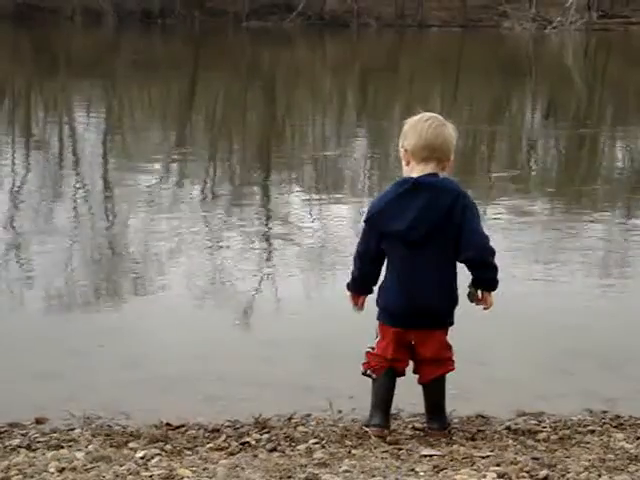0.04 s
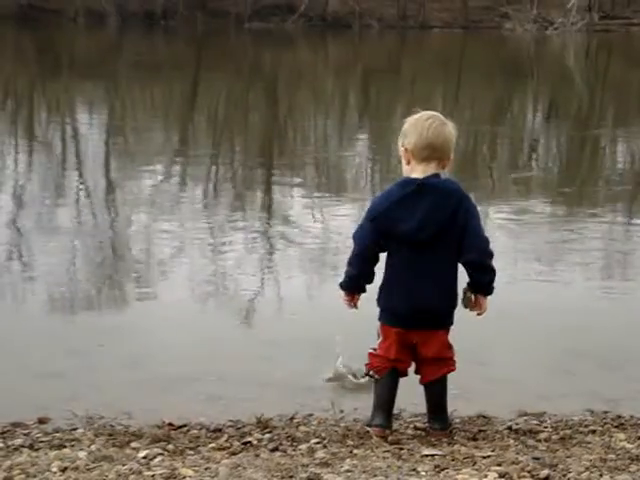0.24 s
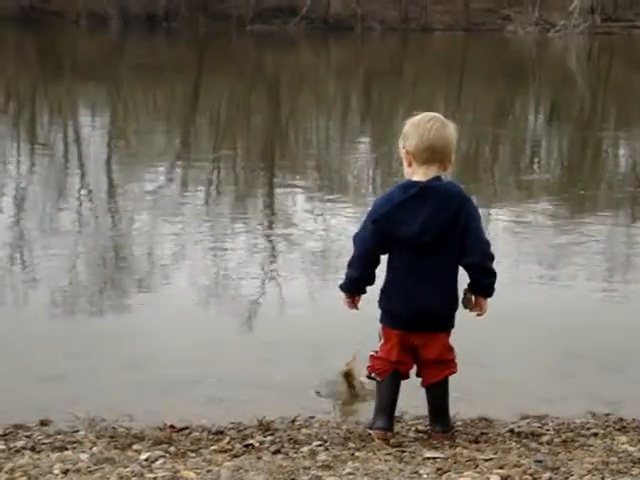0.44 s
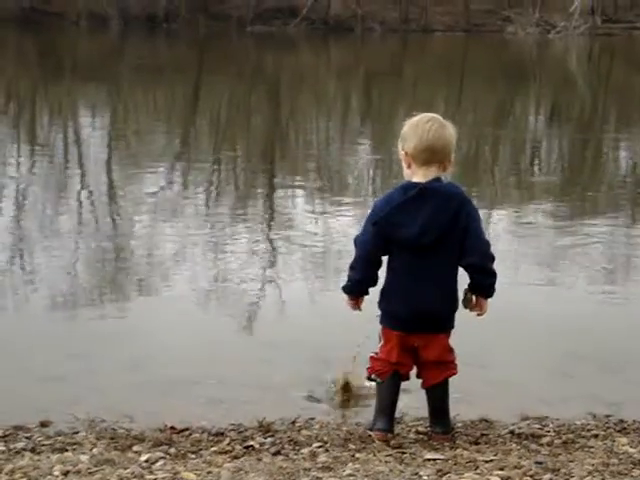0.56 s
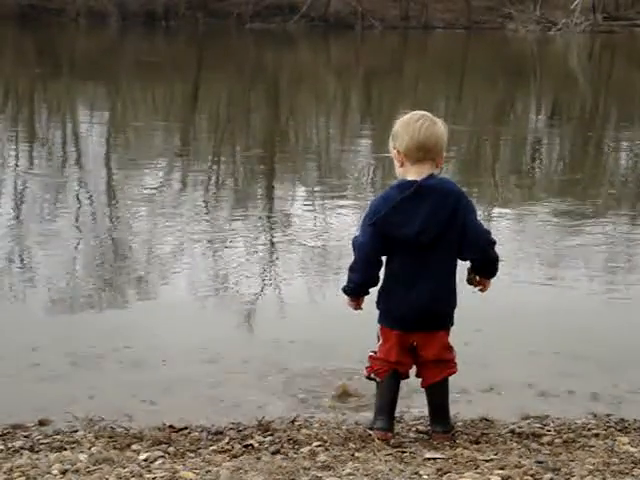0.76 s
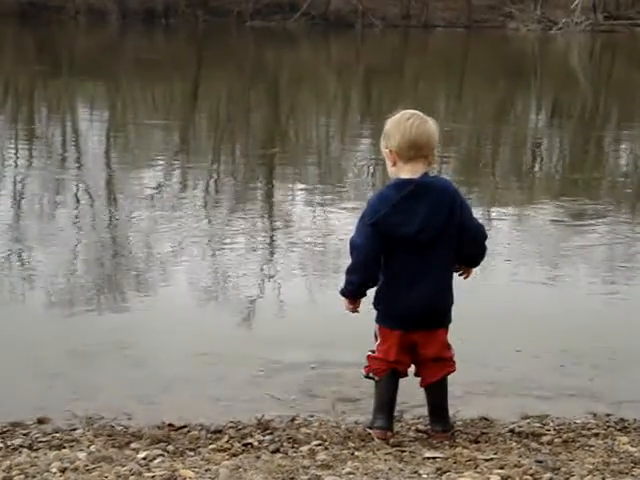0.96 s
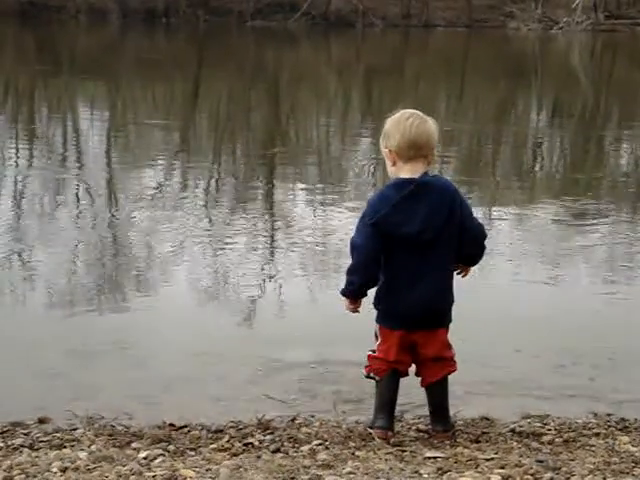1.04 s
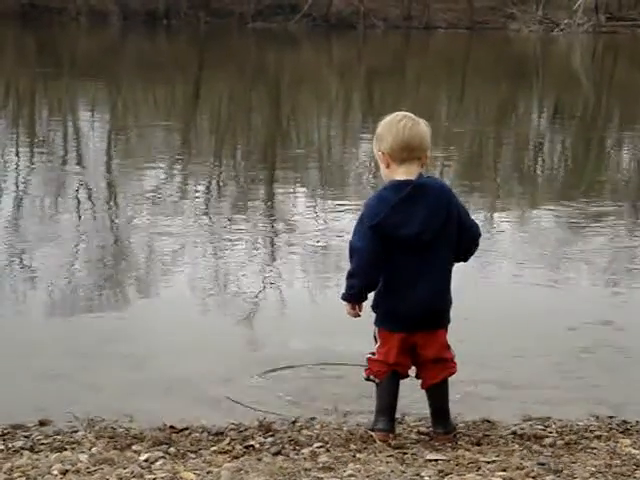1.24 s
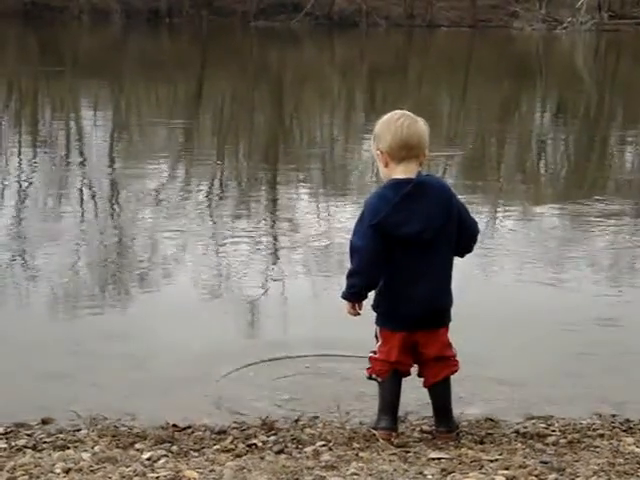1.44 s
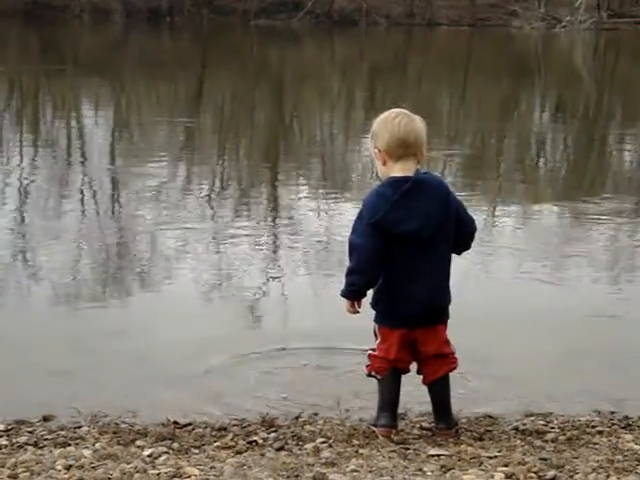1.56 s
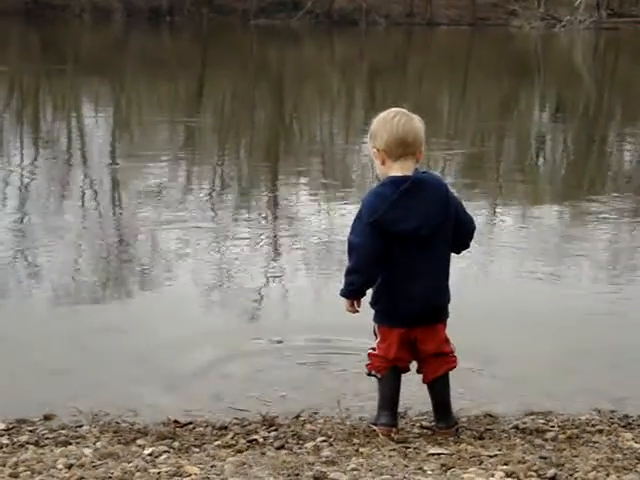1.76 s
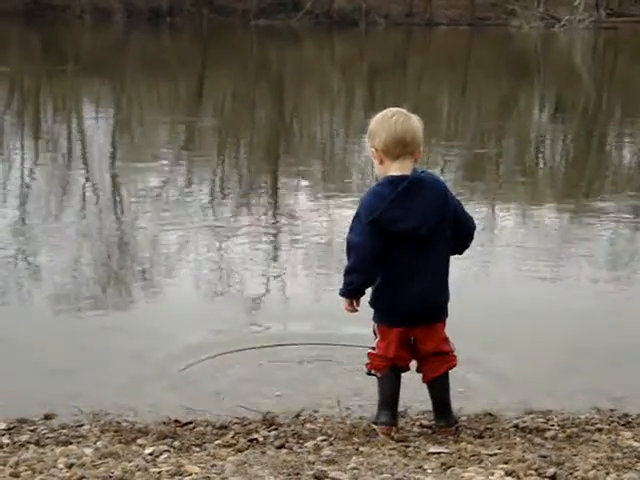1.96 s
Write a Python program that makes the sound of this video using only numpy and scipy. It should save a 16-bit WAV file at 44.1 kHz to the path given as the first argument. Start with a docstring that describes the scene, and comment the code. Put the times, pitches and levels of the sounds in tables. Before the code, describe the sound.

A small rock plops into shallow river water a few metres away. Bubbles blip and drops patter back, then faint far birds whistle over a steady outdoor hush, with a soft low bump near the end.

```python
"""A small rock drops into calm, shallow river water a few metres away, over a steady outdoor hush.
It slaps the surface; the air pocket behind it rings, sinks in pitch and snaps shut.
The thrown sheet of water tears, the crater fills with two gulps, bubbles blip and drops patter back.
As the patter thins, far birds whistle and faint scuffs pass on the shore.
A few soft low bumps sound along the way, the strongest near the end."""
import sys
import numpy as np
from scipy import signal
from scipy.fft import rfft, irfft
from scipy.io import wavfile
from scipy.ndimage import uniform_filter1d

SR = 44100
rng = np.random.default_rng(int(sys.argv[2]) if len(sys.argv) > 2 else 0)


def unload_audio(sound):
    """Save the sound as a 16-bit wav file, at the path given as the first command line argument."""
    columns = np.transpose(np.atleast_2d(sound))
    # keep every value between -1 and 1, then stretch to whole-number steps
    steps = np.round(np.clip(columns, -1, 1) * 32767)
    wavfile.write(sys.argv[1], SR, steps.astype(np.int16))


N = 88200

# outdoor hush: frequency_hz, density_db
HUSH_SPECTRUM = [(20, -30), (50, -5), (100, -3.5), (170, -0.5), (260, 1.5), (380, -3.5), (700, -4),
                 (1300, -6), (2500, -10), (3800, -11), (5000, -14.5), (7500, -18), (9000, -24),
                 (10000, -30.5)]
# soft low bumps: start_s, pitch_hz, level_db, t60_s
LOW_BUMPS = [(0.404, 181, -41, 0.083), (.5, 106, -44, 0.1), (.53, 65.6, -53, 0.27), (1.121, 70, -53, 0.22),
             (1.805, 177, -46.5, 0.16), (1.932, 119.6, -36.5, 0.13), (1.933, 225, -41.5, 0.069),
             (1.968, 91, -41, 0.13)]
# scuffs on the shore: start_s, length_s, centre_hz, spread_octaves, level_db
SHORE_SCUFFS = [(1.48, 0.013, 7500, 0.53, -53), (1.485, 0.012, 3400, 3.7, -50),
                (1.646, 0.029, 2900, .9, -53)]
# bird whistles: start_s, length_s, from_hz, to_hz, level_db
BIRD_NOTES = [(0.655, 0.19, 3810, 3697, -54.5), (0.977, .14, 3780, 3716, -55),
              (1.186, 0.117, 3815, 3745, -54.5), (1.41, 0.059, 3870, 3770, -59),
              (1.53, 0.059, 3920, 3750, -57), (1.644, .04, 4050, 3770, -58),
              (1.732, 0.049, 4210, 3770, -54.5), (1.821, 0.03, 4070, 3760, -55),
              (1.912, 0.048, 4000, 3780, -57), (1.468, 0.022, 5750, 5780, -55.5),
              (1.505, 0.026, 5770, 5790, -54), (1.532, 0.051, 5760, 5765, -57),
              (1.633, 0.026, 5780, 5730, -57.5), (1.668, 0.035, 5760, 5760, -54),
              (1.976, .04, 5770, 5770, -59)]
# hiss of the tearing sheet of water: frequency_hz, density_db
SHEET_SPECTRUM = [(100, -17), (500, -2), (1200, -7), (2800, 3.5), (4200, -2), (7000, -2), (10000, -30)]
# drops landing: start_s, ring_hz, ring_db, glide_octaves_per_s, pulse_db, splat_db, fizz_db
FALLING_DROPS = [(.308, 2160, -40, 5, -48, -50, -52), (0.3162, 5900, -43, 12, -41, -50, -44.5),
                 (.3345, 3420, -44, 15, -44, -48, -53), (0.3811, 3700, -34.5, 0, -39, -48, -42.5),
                 (.384, 2970, -40, 10, -48, -57, -56), (0.4423, 2950, -45, 0, -47, -51, -56),
                 (0.4596, 3600, -32.5, 35, -39, -44, -48), (0.473, 6270, -37, 45, -42, -47, -47),
                 (0.475, 7000, -40, 10, -45, -52, -54), (.512, 9170, -44, 3, -42, -46, -44),
                 (0.532, 3010, -30.5, -2, -27, -38, -45), (0.534, 3600, -40, 0, -33, -41, -48),
                 (0.5563, 2670, -33.5, 89, -42, -41, -54), (.600, 4500, -44, 10, -48, -56, -57),
                 (0.6508, 3280, -41, 8, -48, -50, -54), (0.6715, 2970, -30, 2, -26, -45, -34),
                 (0.688, 5800, -34.5, 0, -31, -38, -50), (.6955, 2080, -40.5, 12, -45, -47, -52),
                 (.7252, 3000, -45, 10, -45, -50, -45.5), (.779, 2040, -42, 10, -50, -50, -55),
                 (1.109, 3020, -39, 0, -50, -53, -54)]
# wet splat of a drop: frequency_hz, density_db
SPLAT_SPECTRUM = [(300, -15), (1100, -3), (3200, 1.5), (4500, -4.5), (7000, -20)]
# bright fizz of a drop: frequency_hz, density_db
FIZZ_SPECTRUM = [(1200, -21), (4000, -8), (6000, -2), (8000, 3.5), (9400, 7), (10200, -12)]
# bubbles after the splash: start_s, pitch_hz, level_db, t60_s, rise_s, glide_octaves_per_s
LATE_BUBBLES = [(0.3155, 1010, -34.5, 0.047, 0.00053, 1.5), (0.315, 1380, -37.5, 0.037, 0.00055, 0),
                (.327, 950, -37.5, 0.052, 0.0017, -19), (.336, 1416, -41.5, 0.072, 0.0017, -18),
                (.426, 605, -32.5, 0.02, 0.0009, -1), (.535, 1020, -37.5, 0.025, 0.00081, -6),
                (.6168, 1394, -33, 0.04, 0.00059, 6), (0.688, 1060, -34, 0.03, 0.00072, -7),
                (0.702, 1240, -35, 0.043, 0.0024, 10)]
# gulps as the crater fills: start_s, length_s, pitch_hz, level_db, glide_octaves_per_s
CRATER_GULPS = [(0.3396, 0.015, 547, -32.5, 11), (0.3593, 0.0099, 591, -32, 37)]
# bubbles trapped by the blows: start_s, pitch_hz, level_db, t60_s
TRAPPED_BUBBLES = [(.24871, 2630, -16.5, .02), (.24881, 3790, -24, .011), (.24882, 5660, -24.5, .010),
                   (.24901, 8230, -23.5, .013), (.24951, 1150, -6, .0022), (.25061, 2395, -15.5, .0095),
                   (.25601, 3940, -29, .012), (.25631, 5610, -30, .011), (.25701, 2210, -32, .02),
                   (.26551, 5790, -25, .006), (.26561, 1716, -13, .014), (.26651, 2926, -21, .016),
                   (.26741, 2466, -20.5, .013), (.26841, 1502, -26, .022), (.26901, 7210, -29, .008),
                   (.27601, 3810, -40, .015), (.27851, 2110, -38, .02)]
# surges that ring the air pocket: start_s, level_db, t60_s
POCKET_SURGES = [(0.2491, -11.4, 0.024), (0.255, -28, 0.021), (0.2658, -23, 0.028), (0.2775, -32, .045)]
# the rock's entry, then the pocket's closing: start_s, pulse_db, spray_db, spray_t60_s, slap_db
SPLASH_BLOWS = [(0.24873, -3.5, -23, 0.023, -27), (0.2655, -26, -29, 0.024, -28)]
# spray of a blow: frequency_hz, density_db
SPRAY_SPECTRUM = [(40, -6), (150, -0.5), (400, -9.5), (700, -12), (1300, -1), (2800, 1.5), (4200, -2.5),
                  (6000, -3), (8200, -2.5), (10000, -15.5)]
# wet slap of a blow: frequency_hz, density_db
SLAP_SPECTRUM = [(400, -20), (1050, -1), (1800, 0), (3200, -2), (4200, -14), (7000, -33)]


def undb(db):
    """The decibel scale: amplitude grows tenfold every 20 dB."""
    return 10 ** (np.asarray(db) / 20)


def since(start):
    """Elapsed time in seconds, zero before the onset."""
    return np.maximum(np.arange(N) / SR - start, 0)


def envelope(start, rise, t60):
    """Exponential damping: after a quick rise, the level falls 60 dB every t60 seconds."""
    t = since(start)
    return (1 - np.exp(-t / rise)) * np.exp(-np.minimum(np.log(1000) * t / t60, 50))


def noise(spectrum):
    """Spectral shaping: white noise is weighted by (Hz, dB) points and scaled to unit rms."""
    hz, db = np.array(spectrum, float).T
    bins_hz = np.maximum(np.arange(N // 2 + 1) * SR / N, 1)
    gain = undb(np.interp(np.log(bins_hz), np.log(hz), db))
    shaped = irfft(rfft(rng.standard_normal(N)) * gain, N)
    return shaped / shaped.std()


def waver(rate_hz):
    """Random modulation: straight ramps between random values, with unit standard deviation."""
    hold = int(SR / rate_hz)
    steps = np.repeat(rng.standard_normal(N // hold + 1), hold)
    ramps = uniform_filter1d(steps, hold)[:N]
    return ramps / ramps.std()


def tone(hz):
    """A sinusoid whose phase is the running integral of its frequency."""
    return np.sin(2 * np.pi * np.cumsum(hz) / SR)


def ring(start, hz, db, t60, rise, glide=0):
    """A damped oscillator whose pitch glides, in octaves per second, until it has died away."""
    t = since(start)
    pitch = hz * 2 ** (glide * np.minimum(t, t60)) * (t > 0)
    return undb(db) * envelope(start, rise, t60) * tone(pitch)


def pulse(start, half_width_s, rebound=0.56):
    """A pressure impulse with a small rebound on either side: the shorter, the wider its spectrum."""
    u = (np.arange(N) / SR - start) / half_width_s
    return (rebound * u ** 2 - 1) * np.exp(-u ** 2 / 2)


def background(hush_db=-49, waver_db=0.85, whine_db=-66.5, whine_hz=7620, waver_hz=27.8):
    """The ambient noise floor: a broadband hush, a faint narrowband whine and damped low bumps."""
    hush = undb(hush_db + waver_db * waver(8.34)) * noise(HUSH_SPECTRUM)
    whine = undb(whine_db) * tone(whine_hz + waver_hz * waver(60))
    bumps = sum(ring(*bump, rise=0.0025) for bump in LOW_BUMPS)
    return hush + whine + bumps


def scuffs(grit_db=3):
    """Faint scuffs on the shore: bands of noise swell and fade, roughened by amplitude modulation."""
    out, grit = np.zeros(N), undb(grit_db * waver(700))
    for start, length, hz, octaves, db in SHORE_SCUFFS:
        band = noise([(hz / 2 ** octaves, -30), (hz, 0), (hz * 2 ** octaves, -30)])
        swell = np.sin(np.pi * np.minimum(since(start) / length, 1))
        out += undb(db) * swell * band
    return out * grit


def birds(waver_hz=10, flutter_db=2):
    """Far whistles are frequency-modulated pure tones, most sliding down and levelling off."""
    out, drift_hz = np.zeros(N), waver_hz * waver(60.1)
    for start, length, from_hz, to_hz, db in BIRD_NOTES:
        progress = np.minimum(since(start) / length, 1)
        hz = to_hz + (from_hz - to_hz) * (1 - progress) ** 2 + drift_hz
        swell = np.sqrt(np.abs(np.sin(np.pi * progress)))
        out += undb(db) * swell * tone(hz)
    return out * undb(flutter_db * waver(49.57))


def tearing_sheet(level_db=-47.5, patter_db=4):
    """The thrown sheet of water tears: random amplitude modulation turns its hiss into a patter."""
    patter = undb(level_db + patter_db * waver(600))
    return patter * envelope(start=0.296, rise=0.011, t60=0.38) * noise(SHEET_SPECTRUM)


def mist(count=200, start_s=0.33, mean_delay_s=0.15, low_hz=1410, high_hz=9450, t60_s=0.0043):
    """Fine droplets ring briefly as they land, ever sparser: their delays are exponentially distributed."""
    out, t = np.zeros(N), np.arange(2048) / SR
    decay = np.exp(-np.log(1000) * t / t60_s)
    for when, pitch, size in rng.random((count, 3)):
        onset = int((start_s - mean_delay_s * np.log(1 - when)) * SR)
        hz = low_hz * (high_hz / low_hz) ** pitch
        level_db = -48 + 8 * size
        if onset + len(t) < N:
            out[onset:onset + len(t)] += undb(level_db) * decay * np.sin(2 * np.pi * hz * t)
    return out


def drops(rise_s=0.00016):
    """Impact and air entrainment: each drop ticks, fizzes, splats and rings a tiny, mostly rising bubble."""
    out, splat, fizz = np.zeros(N), noise(SPLAT_SPECTRUM), noise(FIZZ_SPECTRUM)
    for start, hz, ring_db, glide, pulse_db, splat_db, fizz_db in FALLING_DROPS:
        out += undb(pulse_db) * pulse(start, half_width_s=0.000036)
        out += undb(fizz_db) * envelope(start, rise_s, t60=0.010) * fizz
        out += undb(splat_db) * envelope(start, rise_s, t60=0.025) * splat
        out += ring(start, hz, ring_db, t60=0.014, rise=rise_s, glide=glide)
    return out


def late_bubbles():
    """Bubble resonance: each blip is enclosed air acting as a spring against the mass of the water."""
    return sum(ring(*bubble) for bubble in LATE_BUBBLES)


def gulps():
    """Large bubbles resonate, swell and are choked off as water flows back into the crater."""
    out = np.zeros(N)
    for start, length, hz, db, glide in CRATER_GULPS:
        t = np.minimum(since(start), length)
        pitch = hz * 2 ** (glide * t) * (t > 0)
        out += undb(db) * np.sin(np.pi * t / length) * tone(pitch)
    return out


def trapped_bubbles():
    """Bubbles trapped by the blows ring in free oscillation, sinking in pitch with the pocket."""
    return sum(ring(*bubble, rise=0.00035, glide=-19.5) for bubble in TRAPPED_BUBBLES)


def air_pocket(entry_hz=945, end_hz=489, sink_s=0.018, rise_s=0.00047):
    """Cavity resonance: surges excite the air pocket behind the rock, which rings lower as it deepens."""
    t = since(POCKET_SURGES[0][0])
    hz = end_hz + (entry_hz - end_hz) * np.exp(-t / sink_s)
    strength = sum(undb(db) * envelope(start, rise_s, t60) for start, db, t60 in POCKET_SURGES)
    return -strength * tone(hz * (t > 0))


def blows():
    """Impact radiation: the rock's entry and the pocket's closing each give a pulse, spray and a slap."""
    out = np.zeros(N)
    for start, pulse_db, spray_db, spray_t60, slap_db in SPLASH_BLOWS:
        out += undb(pulse_db) * pulse(start, half_width_s=0.000068)
        out += undb(spray_db) * envelope(start, rise=0.00013, t60=spray_t60) * noise(SPRAY_SPECTRUM)
        out += undb(slap_db) * envelope(start, rise=0.00072, t60=0.023) * noise(SLAP_SPECTRUM)
    return out


def scene():
    """Superposition: the splash, its aftermath and the surroundings add in one channel."""
    splash = blows() + air_pocket() + trapped_bubbles()
    aftermath = gulps() + late_bubbles() + drops() + tearing_sheet() + mist()
    surroundings = scuffs() + birds() + background()
    return (splash + aftermath + surroundings)[None]


def record(dry, cutoff_hz=10180):
    """Band limiting: a small microphone cuts the top treble steeply."""
    lowpass = signal.ellip(10, 0.2, 65, cutoff_hz, fs=SR, output="sos")
    return signal.sosfilt(lowpass, dry)


dry = scene()
out = record(dry)
unload_audio(out)
```